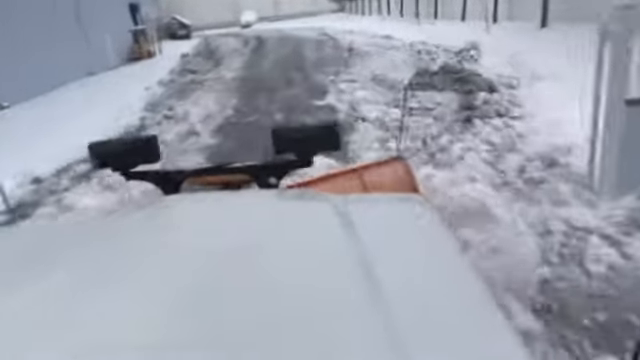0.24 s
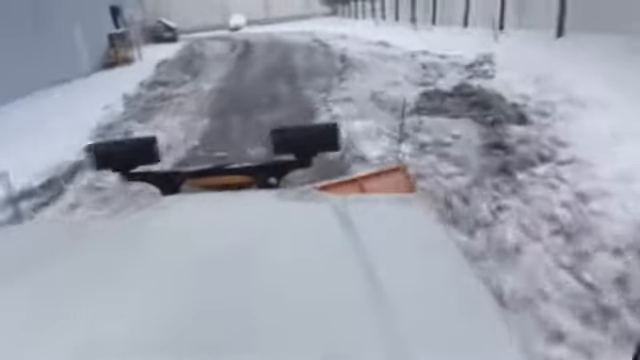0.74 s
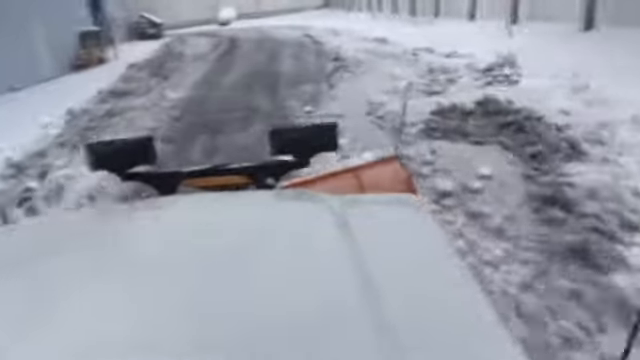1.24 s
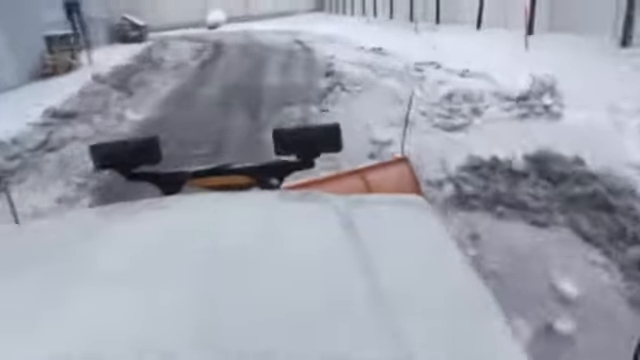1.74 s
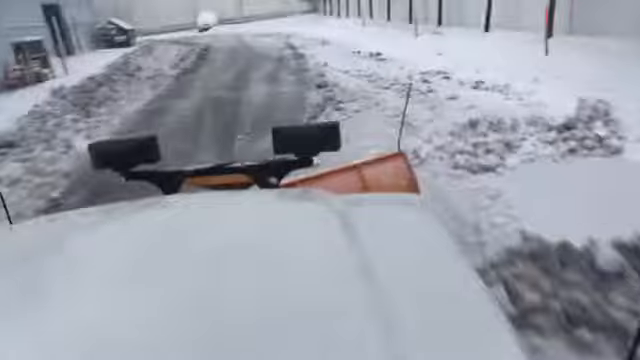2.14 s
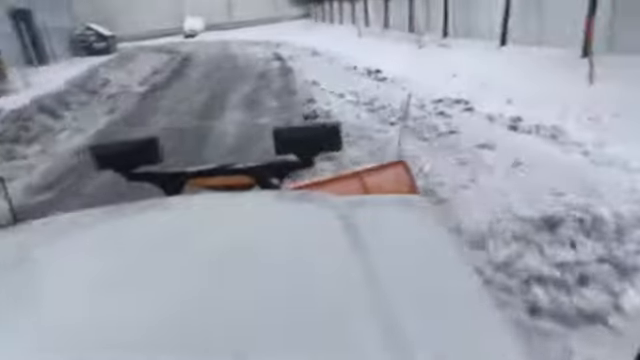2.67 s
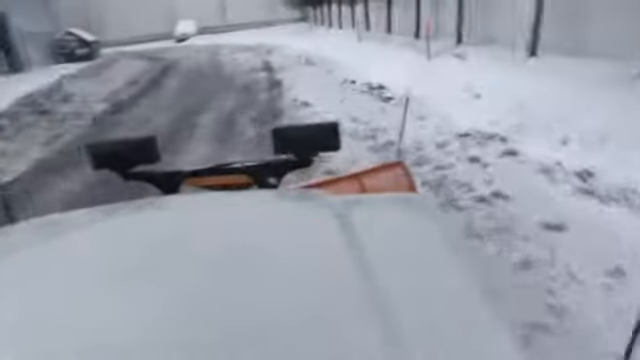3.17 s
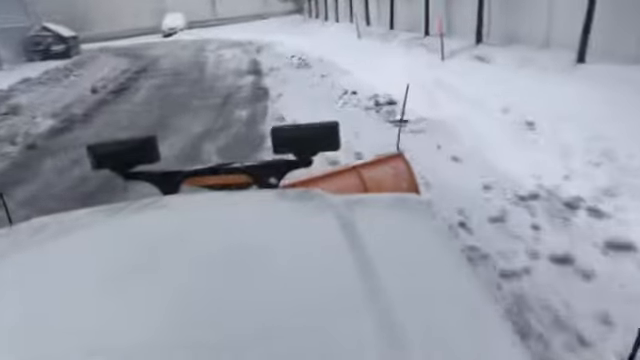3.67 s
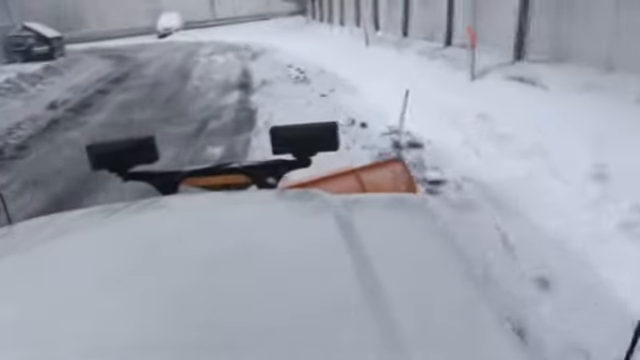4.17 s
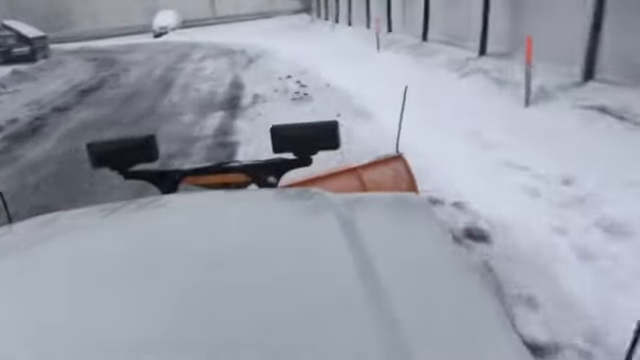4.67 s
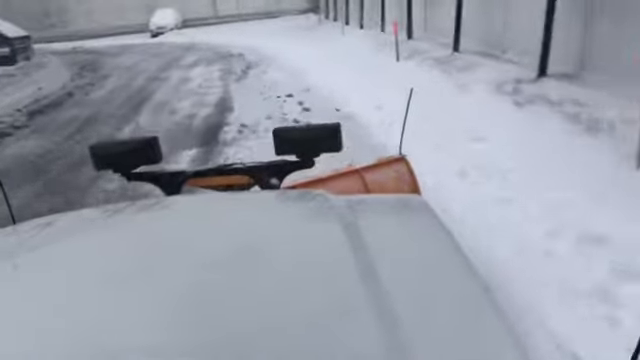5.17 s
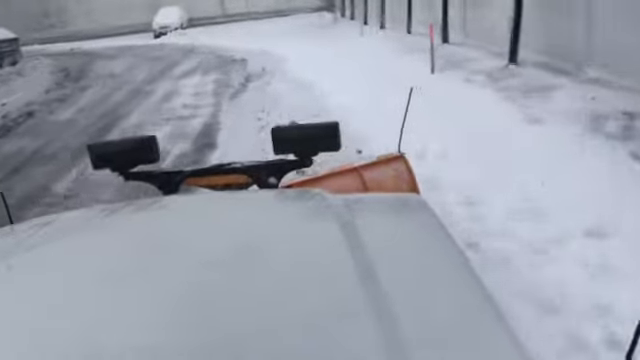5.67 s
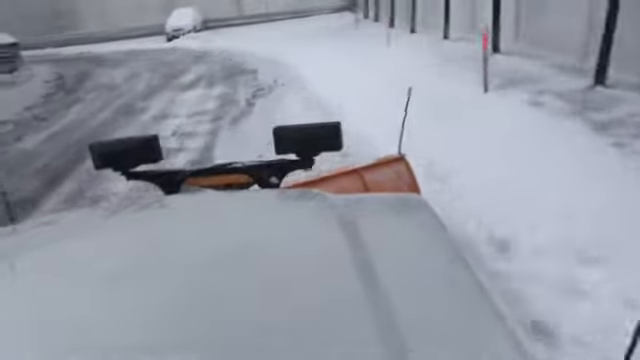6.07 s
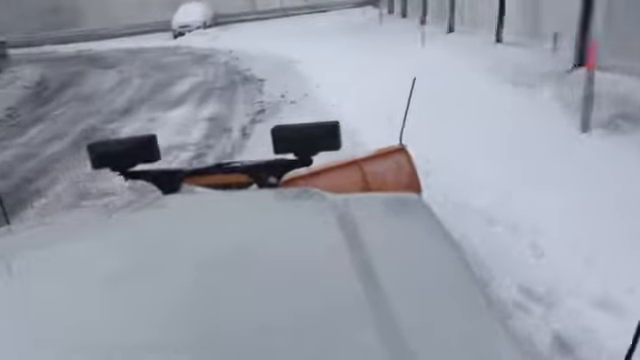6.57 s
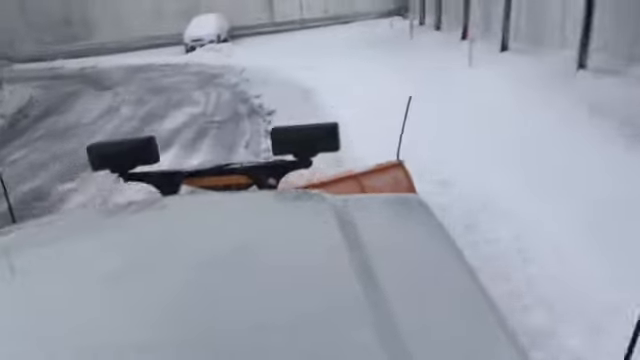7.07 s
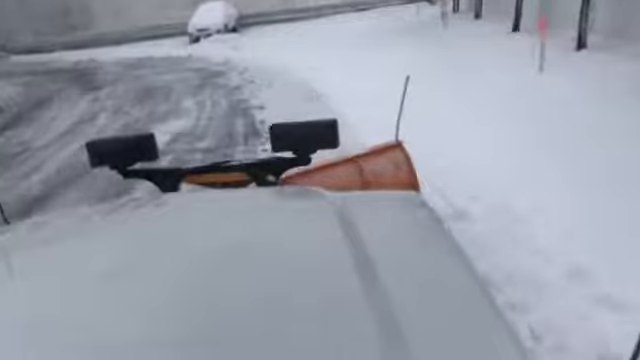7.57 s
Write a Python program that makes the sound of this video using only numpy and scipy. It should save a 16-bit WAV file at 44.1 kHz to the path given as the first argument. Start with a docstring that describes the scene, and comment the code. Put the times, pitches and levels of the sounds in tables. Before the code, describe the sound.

From inside a closed truck cab, a plow blade grinds in uneven bites over wet snow and asphalt, above low engine drone, with sharp knocks.

```python
"""A pickup's plough blade grinds over wet snow and asphalt, heard from inside the closed cab.
Stick-slip grains ring the blade's resonances in bites; knocks are dispersed impulses that sweep down in pitch.
Chunks clunk and ice crunches as short dying tones and noise bursts; low thumps are swelling sines.
Behind lie the engine's sine drone, filtered-noise road rumble, frame growl, small ticks, fizz and hiss."""
import sys
import numpy as np
from scipy import signal
from scipy.fft import rfft, irfft, next_fast_len
from scipy.io import wavfile
from scipy.ndimage import uniform_filter1d

SR = 44100
rng = np.random.default_rng(int(sys.argv[2]) if len(sys.argv) > 2 else 0)


def to_wav(sig):
    """Store sig (one row per channel, or 1-D mono) as 16-bit WAV at the path in sys.argv[1].

    Samples outside -1..1 are clipped; the rate is SR.
    """
    pcm = np.clip(np.atleast_2d(sig), -1, 1) * 32767
    pcm = np.round(pcm).astype(np.int16)
    wavfile.write(sys.argv[1], SR, pcm.T)  # frames by channels


N = 344421
TIME = np.arange(N) / SR


def from_db(db):
    """Decibels to gain."""
    return 10 ** (np.asarray(db) / 20)


def rms_one(x):
    """Scale to rms 1."""
    return x / np.sqrt(np.mean(x ** 2) + 1e-20)


def in_time(rows):
    """Interpolate each column of a curve table, sample by sample."""
    t_s, *columns = np.transpose(rows)
    return [np.interp(TIME, t_s, column) for column in columns]


def gain_at(spectrum, hz):
    """Gain of a spectrum table, falling as the fourth power of frequency beyond its ends."""
    points_hz, db = np.transpose(spectrum)
    below = np.minimum(1, hz / points_hz[0])
    above = np.minimum(1, points_hz[-1] / hz)
    return from_db(np.interp(np.log(hz), np.log(points_hz), db)) * (below * above) ** 4


def dispersed(hz, sweep_s):
    """Bending waves travel faster the higher they are, so a blow arrives as a quick falling sweep."""
    delay_s = sweep_s * (1000 / np.maximum(hz, 45)) ** 0.8
    bin_hz = hz[-1] - hz[-2]
    return np.exp(-2j * np.pi * np.cumsum(delay_s) * bin_hz)


def coloured(x, spectrum, sweep_s=0.0):
    """Apply a spectrum table and a dispersion of sweep_s at 1 kHz; rms 1."""
    size = next_fast_len(N + 4096)
    hz = np.maximum(np.fft.rfftfreq(size, 1 / SR), 1)
    response = gain_at(spectrum, hz) * dispersed(hz, sweep_s)
    return rms_one(irfft(rfft(x, size) * response, size)[:N])


def drift(corner_hz):
    """Slow random curve of rms 1: two-pole low-passed noise."""
    step, settle = 40, 2000   # samples per slow point; slow points dropped
    r = np.exp(-2 * np.pi * corner_hz * step / SR)
    noise = rng.standard_normal(N // step + settle + 2)
    slow = signal.lfilter([1], [1, -2 * r, r * r], noise)[settle:]
    return np.interp(np.arange(N) / step, np.arange(len(slow)), rms_one(slow))


def resonance(x, hz, width_hz):
    """Two-pole band-pass with near-unit gain on top."""
    r = np.exp(-np.pi * width_hz / SR)
    zeros = np.array([1, 0, -1]) * (1 - r * r) / 2
    poles = [1, -2 * r * np.cos(2 * np.pi * hz / SR), r * r]
    return signal.lfilter(zeros, poles, x)


def grains(per_s, spread_db):
    """Random clicks of uneven size and sign."""
    sizes = from_db(spread_db * np.minimum(rng.exponential(1, N), 4))
    signs = rng.choice([-1, 1], N)
    return sizes * signs * (rng.random(N) < per_s / SR)


def evened(x, span_s=0.052):
    """Hold a texture's level steady over spans longer than its lumps."""
    power = uniform_filter1d(x * x, int(span_s * SR))
    return x / np.sqrt(np.maximum(power, 0) + 1e-6)


def crack(hz, width_hz, decay_s, click=5.2):
    """A click and a short dying noise burst around one pitch; peak 1."""
    t = TIME[:SR // 10]
    contact = click * (t == 0) + rng.standard_normal(len(t)) * np.exp(-t / decay_s)
    burst = resonance(resonance(contact, hz, width_hz), hz, width_hz)
    return burst / np.abs(burst).max()


def muffled(x, edge_hz=1750.0):
    """The closed cab keeps out the treble of what breaks outside."""
    return signal.sosfilt(signal.butter(6, edge_hz, fs=SR, output="sos"), x)


def add(out, s, sound):
    """Mix a short sound in at time s."""
    at = int(np.clip(round(s * SR), 0, N - 1))
    out[at:at + len(sound)] += sound[:N - at]


# blade firmness on the ground between bites: [t/s, rel. level/dB]
CONTACT = [(0.0, -2), (0.5, 0), (1.3, -1), (2.1, 0), (2.65, -1.5), (3.3, 0.5), (4.5, -1), (5.5, 0),
           (6.5, -0.5), (6.66, -3.5), (6.94, -2.5), (7.1, 3), (7.81, -1.5)]
# bites into packed snow:
# [t/s, length/s, attack/s, rel. grind level/dB, rel. grit level/dB, frame growl level/dB]
SCRAPES = [(0.586, 0.24, 0.087, -33, -49, -34.5), (0.68, 0.12, 0.018, -32, -53, -30),
           (0.814, 0.16, 0.04, -34, -50.5, -31), (1.024, 0.038, 0.041, -32.5, -47, -34.5),
           (1.202, 0.054, 0.015, -36, -49, -35.5), (1.318, 0.041, 0.015, -36.5, -53, -38),
           (1.496, 0.041, 0.0083, -37, -55, -49), (1.666, 0.28, 0.071, -45.5, -57, -37),
           (1.751, 0.024, 0.015, -35.5, -53, -38), (2.773, 0.095, 0.011, -32, -48, -32.5),
           (3.393, 0.094, 0.0063, -33, -54, -32), (3.524, 0.11, 0.08, -30.5, -45.5, -30),
           (3.941, 0.033, 0.021, -36, -48.5, -33), (4.21, 0.4, 0.035, -42, -64, -35.5),
           (4.689, 0.13, 0.0071, -32.5, -48.5, -37), (4.83, 0.19, 0.062, -31.5, -47, -37.5),
           (5.022, 0.24, 0.075, -31.5, -49, -35.5), (5.266, 0.074, 0.043, -37.5, -53, -31),
           (5.362, 0.053, 0.07, -31, -53, -31), (5.574, 0.12, 0.012, -41, -61, -41),
           (5.9, 0.032, 0.022, -33, -45.5, -56), (6.034, 0.059, 0.02, -32.5, -45, -30.5),
           (6.141, 0.059, 0.012, -29.5, -45, -32.5), (6.332, 0.046, 0.0088, -33.5, -49.5, -32),
           (6.478, 0.022, 0.012, -32.5, -50.5, -38), (6.977, 0.027, 0.0027, -31.5, -57, -34.5),
           (7.092, 0.19, 0.037, -29.5, -53, -38), (7.278, 0.17, 0.047, -27.5, -44, -31.5),
           (7.452, 0.15, 0.039, -32, -45, -28), (7.643, 0.12, 0.056, -36.5, -50.5, -40)]
# sliding between bites: [rel. grind level/dB, rel. grit level/dB, frame growl level/dB]
SLIDE_DB = (-41.6, -53.5, -37.5)


def bites(release_s=0.083, sag_db_per_s=5, lump_db=0.6, lump_hz=17):
    """Level curves/dB: each bite builds, sags as the snow gives way, then lets go, over steady sliding."""
    contact_db, = in_time(CONTACT)
    power = np.outer(from_db(SLIDE_DB), from_db(contact_db)) ** 2
    for s, length_s, attack_s, *levels_db in SCRAPES:
        age_s = np.maximum(TIME - s, 0)
        build = np.minimum(age_s / attack_s, 1)
        sag = from_db(-sag_db_per_s * age_s)
        release = np.exp(-np.maximum(age_s - length_s, 0) / release_s)
        power = power + np.outer(from_db(levels_db), build * sag * release) ** 2
    uneven_snow_db = lump_db * drift(lump_hz)
    return 10 * np.log10(power) + uneven_snow_db


# resonances of blade and plough frame: [f/Hz, width/Hz, rel. level/dB]
BLADE_MODES = [(285.4, 40.4, -2), (339, 69, -0.5), (388, 46.6, 1), (454, 47.3, -0.5), (529.6, 50.6, -2),
               (606, 96, -7.5), (715, 72, -7), (797, 81, -10.5), (1057, 175, -16.5)]
# grinding spectrum: [f/Hz, rel. level/dB]
GRIND = [(200, -21.5), (270, 6), (800, 1.1), (1200, -3.5), (1500, -13.5), (2100, -41)]
# gritty edge spectrum: [f/Hz, rel. level/dB]
GRIT = [(600, -2.5), (950, 0), (1300, -1.5), (1650, -6), (1900, -9.5), (2150, -14), (2450, -19.5),
        (2900, -28), (4000, -43), (6000, -54)]


def blade(grind_db, grit_db, slip_db=1.36, shift_db=2.0, grit_trim_db=-4.0, patchy_db=1.53):
    """The edge sticks and slips over stones and ice; the wandering contact point favours changing resonances."""
    slip = slip_db * drift(85)
    stones = grains(1200, spread_db=2.0)
    ringing = np.zeros(N)
    for k, (hz, width_hz, db) in enumerate(BLADE_MODES):
        mode_gain = (-1) ** k * from_db(db + shift_db * drift(6.9))
        ringing += mode_gain * resonance(stones, hz, width_hz)
    grind = evened(coloured(ringing, GRIND, sweep_s=0.00197))

    sand = stones + 0.36 * grains(4000, spread_db=5.5)
    plate = np.zeros(N)
    # close-set higher plate modes
    for k, hz in enumerate(np.geomspace(700, 5000, 18)):
        mode_gain = (-1) ** k * from_db(patchy_db * drift(6.6))
        plate += mode_gain * resonance(sand, hz, hz / 6)
    grit = evened(coloured(plate, GRIT, sweep_s=0.001928))
    return from_db(grind_db + slip) * grind + from_db(grit_db + grit_trim_db + 0.19 * slip) * grit


# blade catches: [t/s, rel. level/dB, rel. low thud level/dB, top f/Hz, sweep time at 1 kHz/s]
KNOCKS = [(2.4888, 25, 8, 6500, 0.0017), (3.0167, 17, -0.5, 2970, 0.00222), (4.1236, 21.5, -7, 750, 0.0029),
          (5.4256, 7, 7, 592, 0.0014), (5.4543, 13, 4, 500, 0.001), (6.7250, 7.5, -8, 830, 0.002),
          (7.6167, 11, 17.5, 885, 0.00159), (7.6338, 12, 17, 955, 0.0016), (7.6358, 12, 16, 600, 0.0016),
          (7.643, 10.5, -5, 1020, 0.00114)]
# bending-wave spectrum of a knock: [f/Hz, rel. level/dB]
KNOCK_COLOUR = [(45, -34), (70, -9), (95, 4), (135, 8.5), (200, 7), (390, 6), (570, -2), (800, 1.5),
                (1450, -3), (1800, -13), (2450, -19), (3150, -25), (3700, -25.5), (5500, -41), (12000, -38)]


def knocks(thud_hz=335.0, notch_hz=2110.0, notch_width=0.1):
    """Each catch sends a bending wave through the steel; a notch parts the thump from the crack."""
    out, size = np.zeros(N), 8192
    hz = np.maximum(np.fft.rfftfreq(size, 1 / SR), 1)
    lead = 220   # samples of room before the blow
    onset = np.minimum(2 * np.arange(size // 2) / lead, 1) ** 2
    notch = np.tanh(np.abs(np.log(hz / notch_hz)) / notch_width) ** 2
    for s, level_db, thud_db, top_hz, sweep_s in KNOCKS:
        thud = thud_db / (1 + (hz / thud_hz) ** 4)
        softness = 1 / np.sqrt(1 + (hz / top_hz) ** 10)
        gain = from_db(level_db + thud) * gain_at(KNOCK_COLOUR, hz) * softness * notch
        wave = np.roll(irfft(gain * dispersed(hz, sweep_s)), lead)[:size // 2]
        add(out, s - lead / SR, onset * wave)
    return out


# chunks of ice and packed snow on the blade:
# [t/s, rel. ring level/dB, ring f/Hz, ring decay/s, rel. clack level/dB]
CLUNKS = [(0.657, -32, 447, 0.007, -45), (0.715, -22.5, 460, 0.024, -48), (0.877, -17.5, 336, 0.0036, -40),
          (0.924, -27, 298, 0.0069, -47), (1.520, -20.5, 467, 0.004, -37), (1.697, -21.5, 460, 0.0034, -51),
          (1.766, -18.5, 411, 0.0097, -49), (2.385, -20, 303, 0.004, -52), (3.405, -27, 674, 0.017, -48),
          (3.436, -24, 550, 0.0095, -41), (3.585, -38, 487, 0.007, -43), (4.694, -20, 472, 0.016, -47),
          (4.761, -21, 440, 0.0084, -34.5), (4.895, -14, 451, 0.0068, -38),
          (5.143, -24.5, 483, 0.0094, -43), (5.599, -23.5, 370, 0.0072, -53), (5.791, -23, 395, 0.009, -43),
          (6.032, -19.5, 396, 0.0046, -36), (6.148, -18.5, 430, 0.0062, -35),
          (6.22, -25.5, 376, 0.0089, -42), (6.598, -30, 418, 0.0039, -41), (6.987, -20.5, 450, 0.0057, -35),
          (7.211, -18.5, 480, 0.011, -52), (7.286, -20.5, 410, 0.01, -37)]


def clunks(attack_s=0.002, clack_s=0.0037, clack_hz=920.0, clack_width_hz=890.0):
    """A chunk lands with a dull clack and leaves the blade ringing for a few cycles."""
    out, t = np.zeros(N), TIME[:SR // 10]
    for s, ring_db, hz, decay_s, clack_db in CLUNKS:
        attack = np.minimum(t / attack_s, 1)
        envelope = attack * np.exp(-np.maximum(t - attack_s, 0) / decay_s)
        add(out, s, from_db(ring_db) * envelope * np.sin(2 * np.pi * hz * t))
        add(out, s, from_db(clack_db) * crack(clack_hz, clack_width_hz, clack_s))
    return muffled(out)


def crunches(base_db=-60, follows=0.85, centre_hz=1100, width_hz=3500.0, decay_s=0.01):
    """Ice crumbles for a moment after each knock, the more the heavier the blow."""
    out = np.zeros(N)
    for s, level_db, thud_db, *_ in KNOCKS:
        crunch_db = base_db + follows * (level_db + thud_db)
        add(out, s, from_db(crunch_db) * crack(centre_hz, width_hz, decay_s))
    return muffled(out)


# low thumps: [t/s, envelope peak level/dB, f/Hz, swell time/s]
THUMPS = [(1.929, -22, 99, 0.017), (2.497, -7.5, 96.5, 0.01), (3.023, -24, 85.5, 0.013),
          (4.488, -24.5, 93, 0.03), (5.425, -14.5, 74, 0.012), (5.457, -13.5, 76.4, 0.0097),
          (7.072, -19.5, 70.5, 0.013), (7.646, -6, 73, 0.0075), (7.702, -20.5, 69, 0.017)]


def low_thumps():
    """A deep boom, one sine each, swells and dies within a few cycles."""
    out, t = np.zeros(N), TIME[:SR // 10]
    for s, level_db, hz, swell_s in THUMPS:
        envelope = t / swell_s * np.exp(0.5 - 0.5 * (t / swell_s) ** 2)
        add(out, s, from_db(level_db) * envelope * np.sin(2 * np.pi * hz * t))
    return out


# engine boom in the cab: [t/s, rel. level/dB]
ENGINE = [(0.0, -33), (0.35, -32), (0.6, -29), (0.9, -36), (1.25, -28.5), (1.7, -34), (1.95, -27),
          (2.4, -36), (2.92, -23.5), (3.27, -34), (3.65, -27.5), (4.1, -30.5), (4.37, -33.5), (4.85, -24.5),
          (5.35, -31.5), (6.25, -31), (6.8, -33.5), (7.1, -29.5), (7.81, -34)]


def engine(order_hz=51.04, drone_trim_db=-5.5, wobble_hz=1.33, shake_db=-42.0, shake_hz=32.8):
    """A low engine order, nearly steady in pitch, booms in the cab; the body shakes below it."""
    level_db, = in_time(ENGINE)
    waver = 1 + 0.33 * drift(7.2)
    phase = 2 * np.pi * np.cumsum(order_hz + wobble_hz * drift(2.9)) / SR
    drone = np.sqrt(2) * np.sin(phase) * waver
    shake = resonance(resonance(rng.standard_normal(N), shake_hz, 15.0), shake_hz, 15.0)
    return from_db(level_db + drone_trim_db) * drone + from_db(shake_db) * rms_one(shake)


# tyre shake of the cab: [t/s, rel. rumble level/dB]
ROAD = [(0.0, -36), (1.13, -42.5), (1.26, -40.5), (3.35, -43), (3.57, -41.5), (5.37, -39), (5.55, -38.5),
        (6.68, -41.5), (7.16, -34.5), (7.81, -36.5)]


def road_level():
    """Rumble curve/dB: how hard the tyres shake the cab."""
    rumble_db, = in_time(ROAD)
    return rumble_db


# tyre rumble spectrum: [f/Hz, rel. level/dB]
RUMBLE = [(25, -35), (42, -9), (62, 4), (80, -0.5), (108, 4.5), (135, -7.5), (190, -9.5)]
# frame growl spectrum: [f/Hz, rel. level/dB]
GROWL = [(105, -25), (140, 4.5), (170, 2), (210, 1.5), (250, -2), (310, -7.5)]


def road(rumble_db, growl_db, rumble_trim_db=4.5):
    """Tyres shake the cab as low noise; the loaded plough frame growls as filtered grains."""
    rumble = evened(coloured(rng.standard_normal(N), RUMBLE), span_s=0.47)
    growl = evened(coloured(grains(700, spread_db=2.0), GROWL), span_s=0.14)
    return from_db(rumble_db + rumble_trim_db) * rumble + from_db(growl_db) * growl


# ticks and cracks: [t/s, snap peak level/dB, snap f/Hz, body peak level/dB, body f/Hz]
TICKS = [(0.872, -68, 9600, -47, 2400), (0.9174, -39.5, 9900, -49, 3700), (0.9348, -48, 10800, -51, 4500),
         (0.976, -48, 10500, -50, 3200), (1.072, -48, 7940, -50, 3400), (1.689, -48, 10700, -51, 3200),
         (1.771, -54, 9000, -49, 3800), (1.846, -51, 10500, -50, 4200), (2.4755, -41, 9200, -46, 1500),
         (3.0172, -47, 4280, -35, 2000), (3.053, -39, 5300, -34, 1700), (3.0835, -49, 10400, -53, 3100),
         (3.2572, -49, 10600, -51, 4300), (3.332, -50, 9000, -56, 3800), (3.494, -49, 10800, -56, 3300),
         (3.6647, -48, 8900, -51, 3500), (4.15, -53, 11300, -51, 3300), (4.2436, -42, 10400, -45, 4000),
         (5.064, -39.5, 8000, -46, 3500), (5.192, -48, 11000, -57, 4000), (5.2311, -50, 10500, -50, 2900),
         (5.301, -47, 8000, -48, 2900), (5.43, -48, 9400, -50, 3800), (5.492, -45, 7260, -50, 3100),
         (5.6591, -43, 9500, -40, 1420), (5.7388, -52, 8900, -49.5, 2600), (5.799, -49, 10200, -62, 3500),
         (5.815, -45, 11000, -48, 4000), (6.3776, -46, 8900, -57, 3600), (6.419, -48, 10500, -54, 3800),
         (6.439, -49, 11600, -57, 3100), (6.4903, -62, 9700, -49, 2980), (6.8313, -45, 10800, -46.5, 3800),
         (6.849, -48, 10500, -55, 3800), (7.0021, -50, 9000, -48, 4400), (7.089, -48, 10000, -50, 3800),
         (7.2425, -48, 9000, -48, 4000), (7.3346, -39, 8800, -44, 3500), (7.348, -47, 9500, -50, 3800),
         (7.562, -47, 11000, -56, 3800), (7.568, -51, 9000, -47, 2600), (7.583, -40, 11400, -52, 4000),
         (7.599, -46, 9900, -48, 3200), (7.699, -48, 12400, -45, 3500), (7.748, -46, 9500, -39.5, 1800),
         (7.7724, -54, 9500, -43, 2000), (7.778, -41.5, 7650, -58, 3500), (7.7902, -53, 9500, -37, 1680)]


def ticks(load_db, jolt_db, snap_s=0.00079, snap_width_hz=3900.0, body_s=0.00064,
          faint_snap_db=-58.5, faint_body_db=-60.0, faint_per_s=46.0):
    """Bright snaps on duller bodies, one sharpening a knock; faint ones bunch with blade load and cab shake."""
    out = np.zeros(N)
    for s, snap_db, snap_hz, body_db, body_hz in TICKS:
        add(out, s, from_db(snap_db) * crack(snap_hz, snap_width_hz, snap_s))
        add(out, s, from_db(body_db) * crack(body_hz, body_hz, body_s))
    fade = np.exp(-TIME[:SR // 100] / snap_s)
    # dB of tick rate per dB of grinding and of road shake
    shaking = from_db(0.63 * load_db + 0.54 * jolt_db + 3.2 * drift(6.5))
    strikes = np.abs(grains(faint_per_s * shaking, spread_db=-0.5))
    scuffs = signal.lfilter(fade, 1, strikes) * rng.standard_normal(N)
    faint_snaps = from_db(faint_snap_db) * resonance(scuffs, 9300.0, 8000.0)
    faint_bodies = from_db(faint_body_db) * resonance(scuffs, 3500.0, 2500.0)
    return out + faint_snaps + faint_bodies


def fizz(base_db=-93, follows=0.87, length_s=0.055, centre_hz=5430.0, width_hz=7200.0):
    """Band-passed noise: a faint treble fizz for a moment after a knock, louder for heavier ones."""
    power = np.zeros(N)
    for s, level_db, thud_db, *_ in KNOCKS:
        fade = (TIME > s) / (1 + ((TIME - s) / length_s) ** 8)
        power += (from_db(base_db + follows * (level_db + thud_db)) * fade) ** 2
    return np.sqrt(power) * rms_one(resonance(rng.standard_normal(N), centre_hz, width_hz))


# hiss spectrum: [f/Hz, rel. level/dB]
HISS = [(1500, 11.5), (3000, 5), (4200, 3.5), (5500, 1.5), (9000, -1.5), (12000, -4.5), (16000, -4)]


def hiss(jolt_db, level_db=-71.5, follows=0.2):
    """Thin airy noise in the cab, a little stronger on rough ground."""
    return from_db(level_db + follows * jolt_db) * coloured(rng.standard_normal(N), HISS)


def scene():
    """Sum of everything heard."""
    grind_db, grit_db, growl_db = bites()
    rumble_db = road_level()
    load_db = grind_db - grind_db.mean()
    jolt_db = rumble_db - rumble_db.mean()
    plough = blade(grind_db, grit_db) + knocks() + clunks() + crunches()
    lows = low_thumps() + engine() + road(rumble_db, growl_db)
    treble = ticks(load_db, jolt_db) + fizz() + hiss(jolt_db)
    return (plough + lows + treble)[None]


def record(dry, bass_hz=20, cutoff_hz=15900):
    """The microphone drops the deepest bass; peaks clip at full scale and the top is cut."""
    x = signal.sosfilt(signal.butter(2, bass_hz, "high", fs=SR, output="sos"), dry)
    top_cut = signal.ellip(10, 0.1, 80, cutoff_hz, fs=SR, output="sos")
    return signal.sosfilt(top_cut, np.clip(x, -1, 1))


dry = scene()
out = record(dry)
to_wav(out)
```